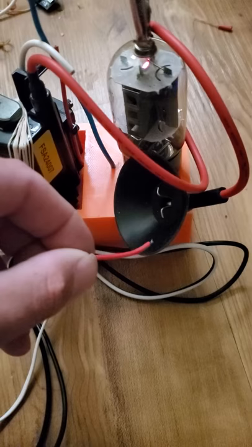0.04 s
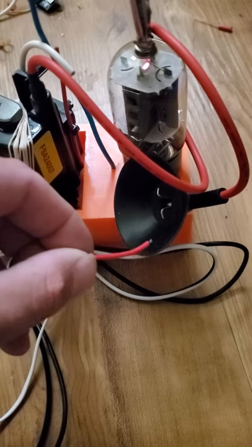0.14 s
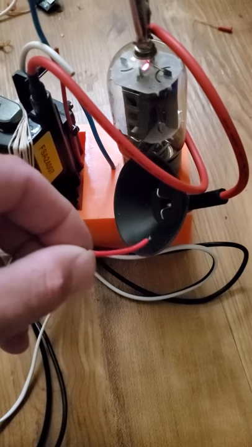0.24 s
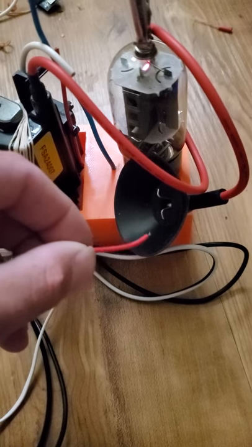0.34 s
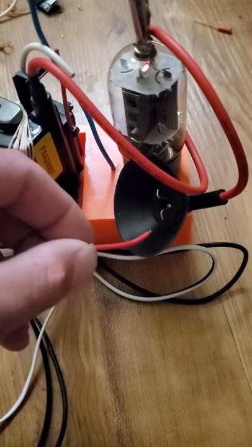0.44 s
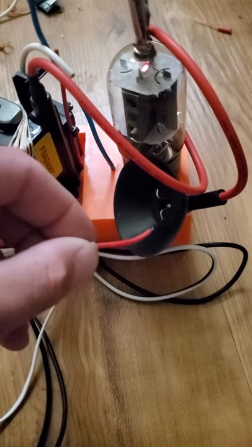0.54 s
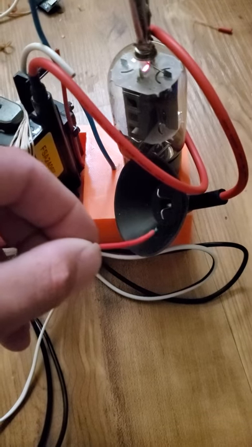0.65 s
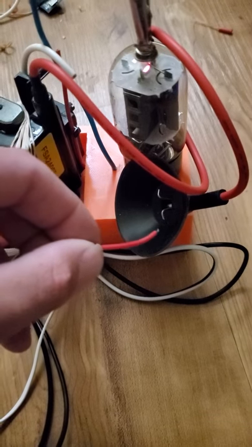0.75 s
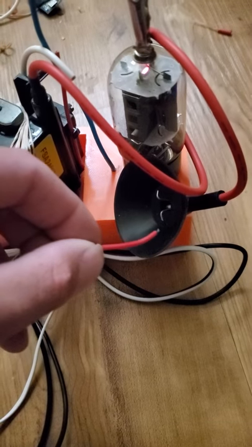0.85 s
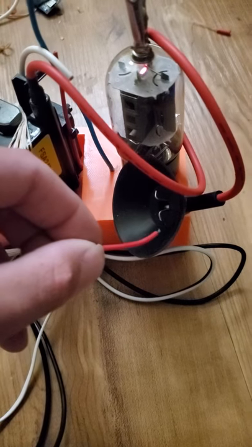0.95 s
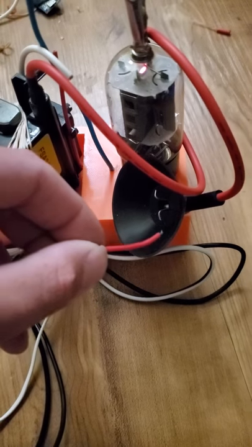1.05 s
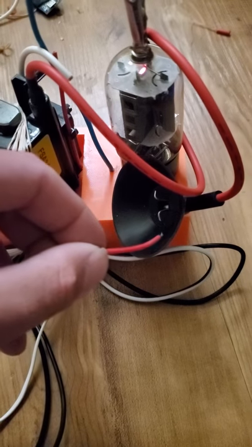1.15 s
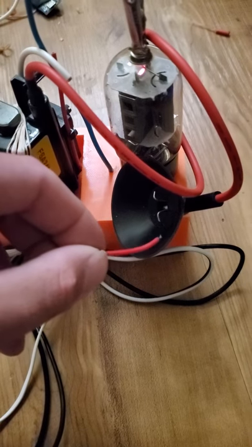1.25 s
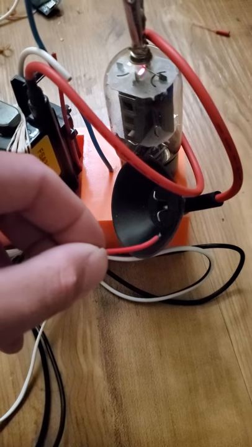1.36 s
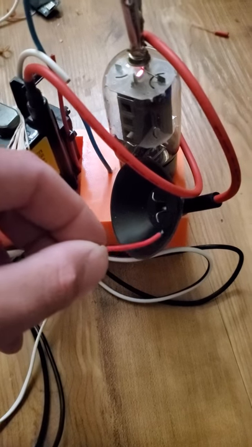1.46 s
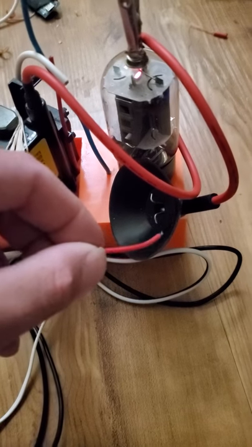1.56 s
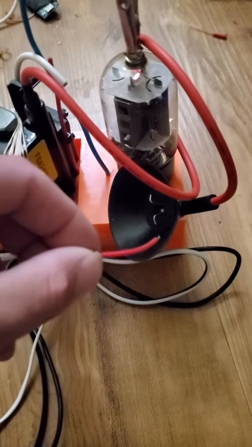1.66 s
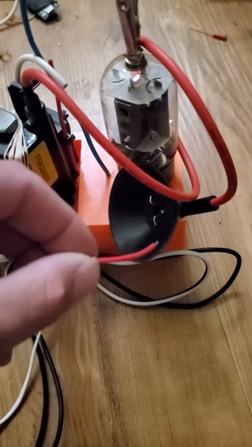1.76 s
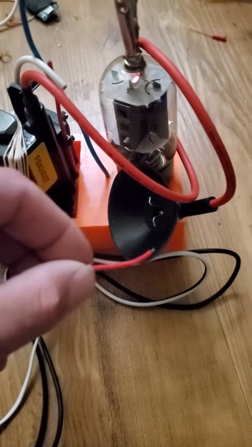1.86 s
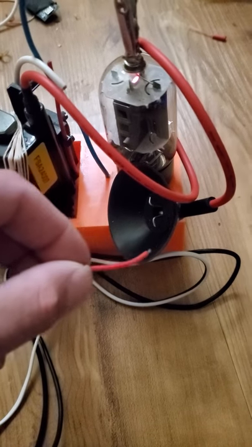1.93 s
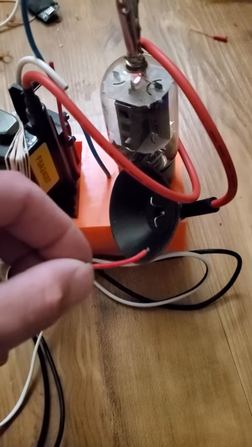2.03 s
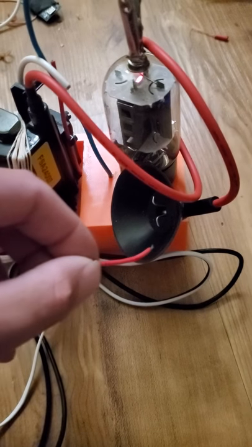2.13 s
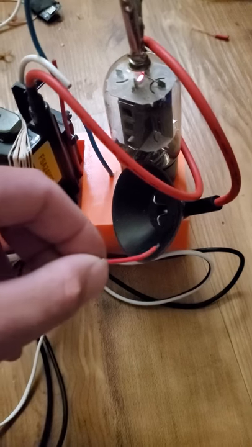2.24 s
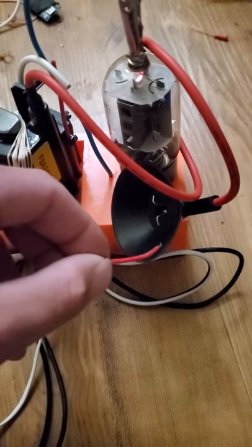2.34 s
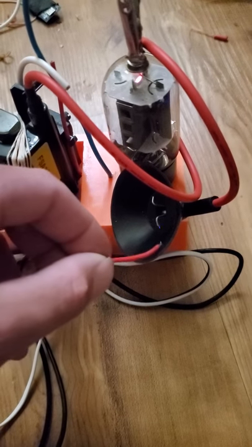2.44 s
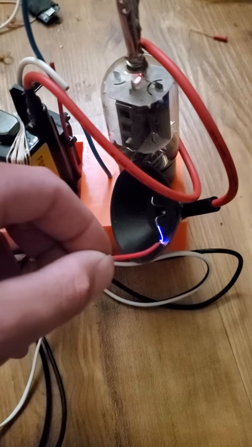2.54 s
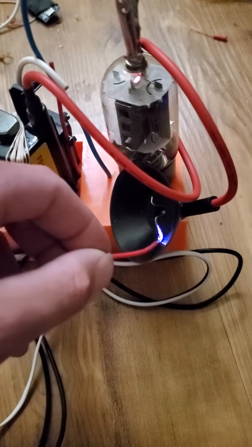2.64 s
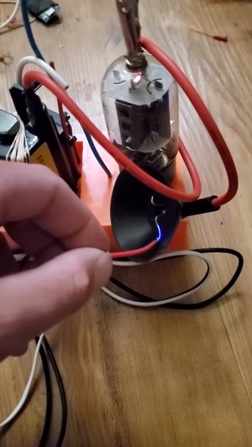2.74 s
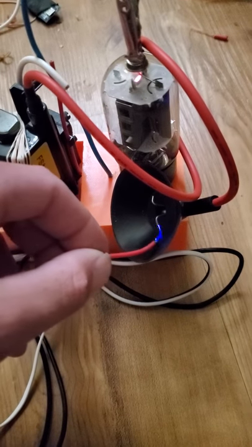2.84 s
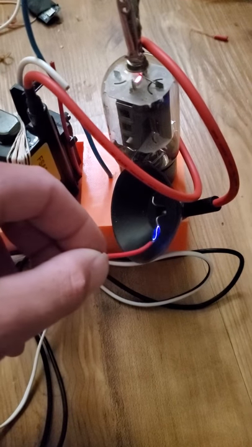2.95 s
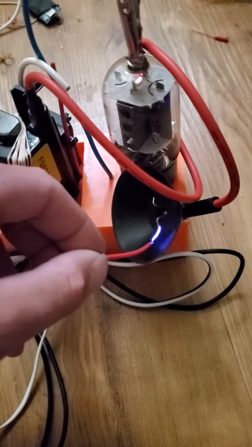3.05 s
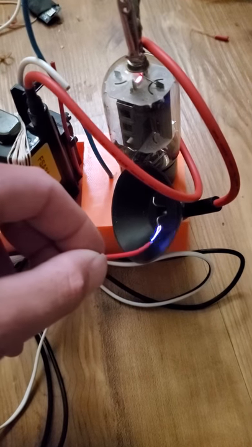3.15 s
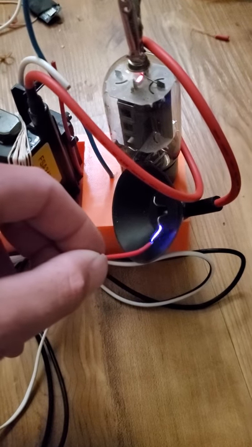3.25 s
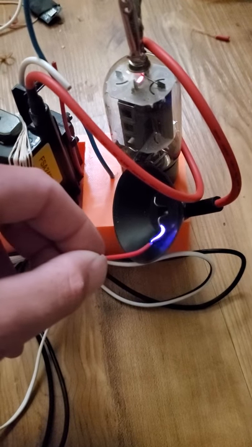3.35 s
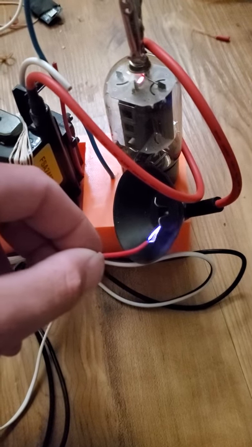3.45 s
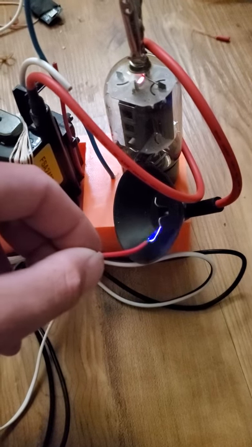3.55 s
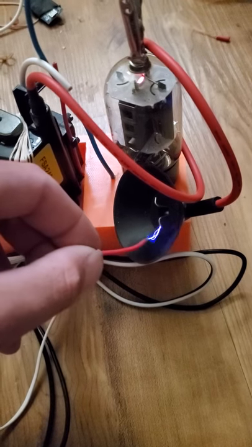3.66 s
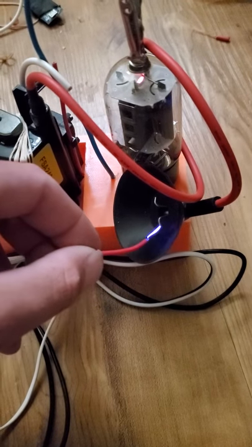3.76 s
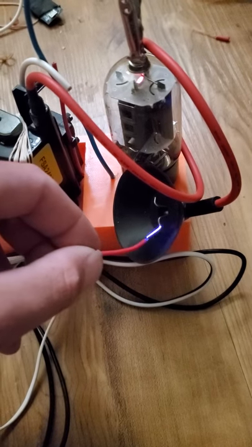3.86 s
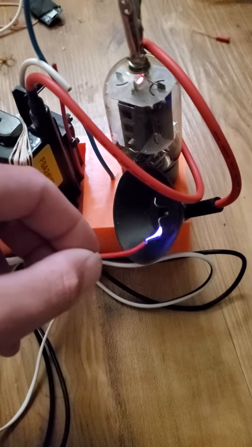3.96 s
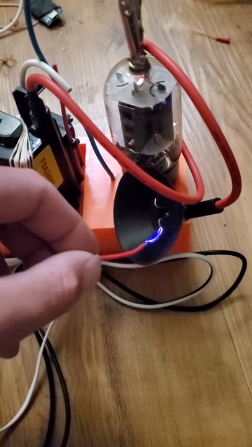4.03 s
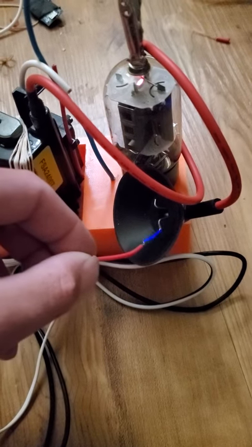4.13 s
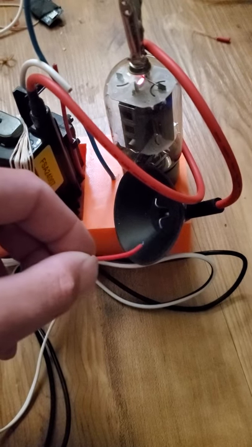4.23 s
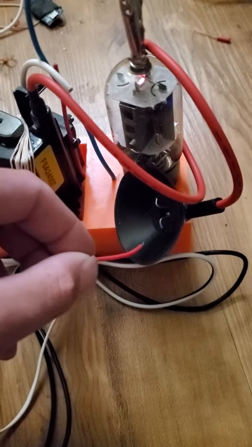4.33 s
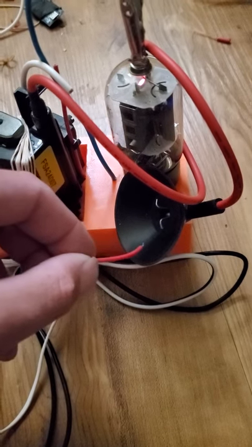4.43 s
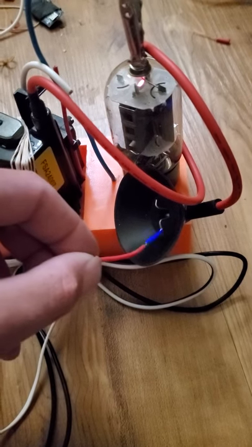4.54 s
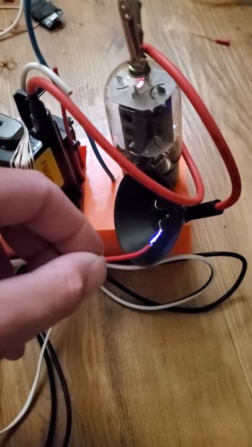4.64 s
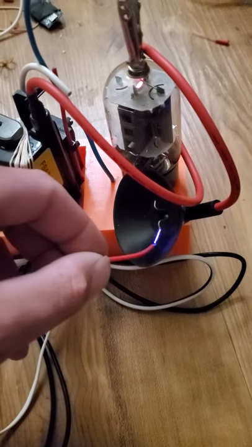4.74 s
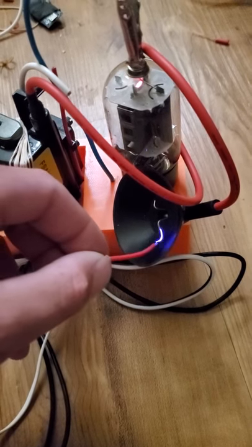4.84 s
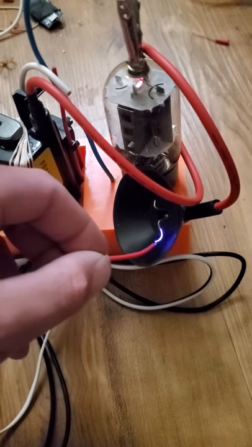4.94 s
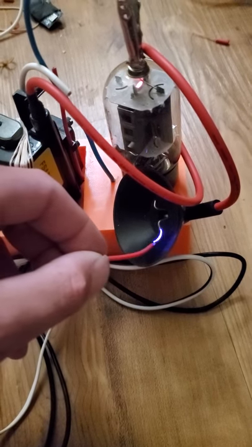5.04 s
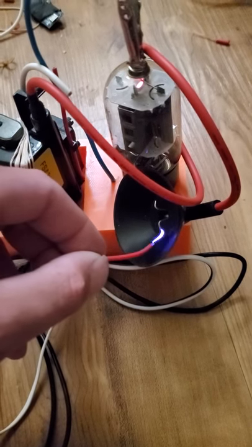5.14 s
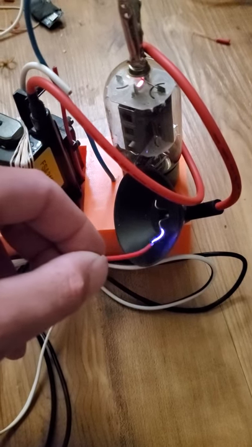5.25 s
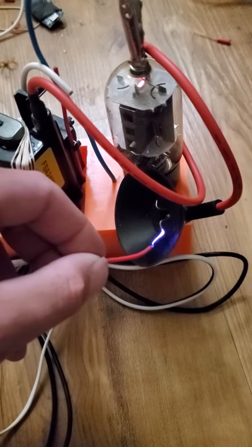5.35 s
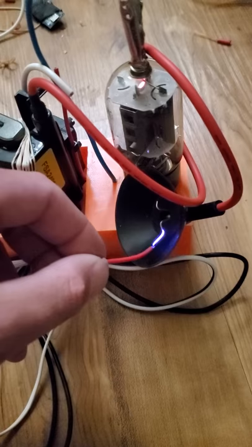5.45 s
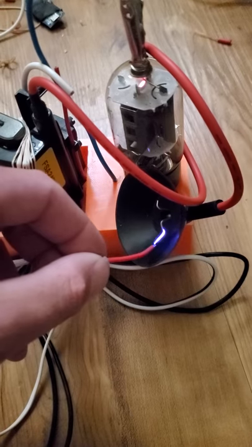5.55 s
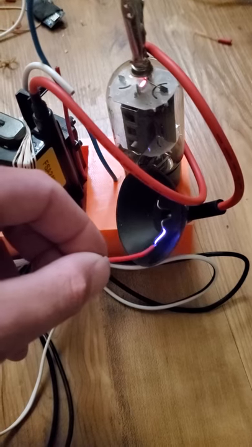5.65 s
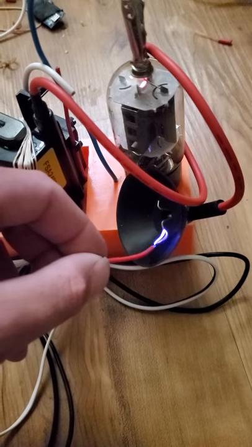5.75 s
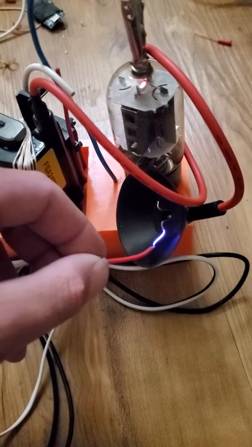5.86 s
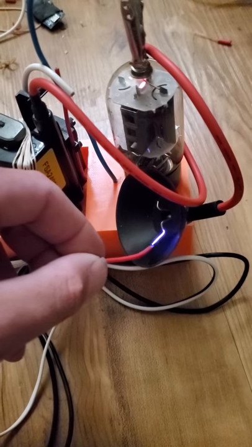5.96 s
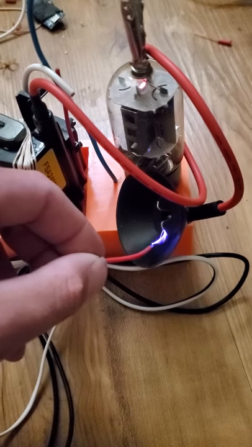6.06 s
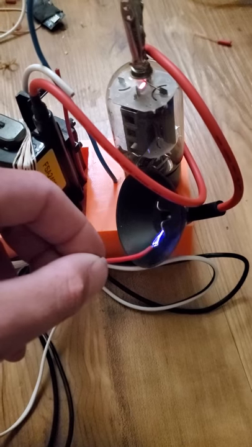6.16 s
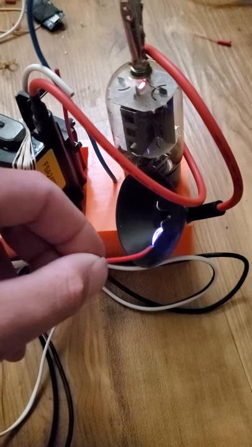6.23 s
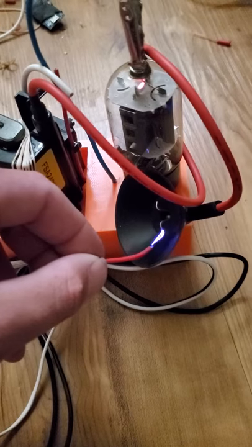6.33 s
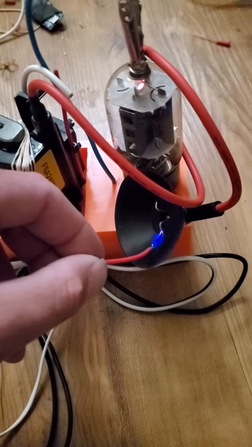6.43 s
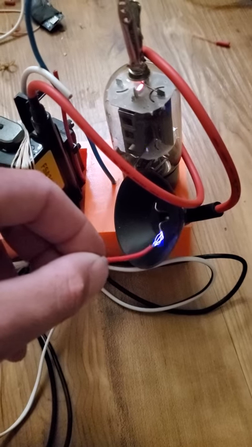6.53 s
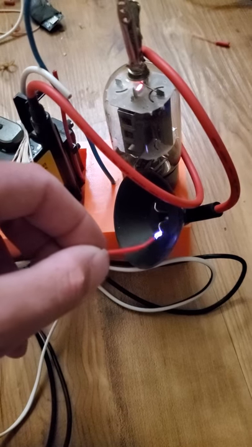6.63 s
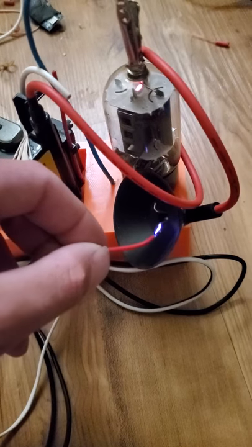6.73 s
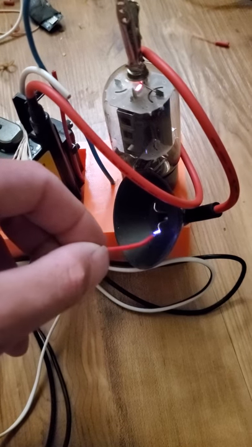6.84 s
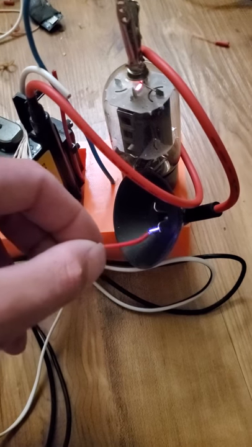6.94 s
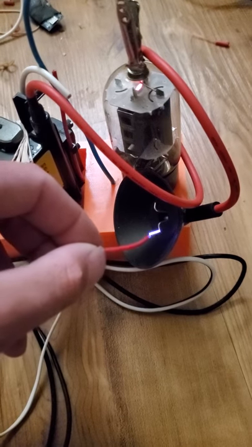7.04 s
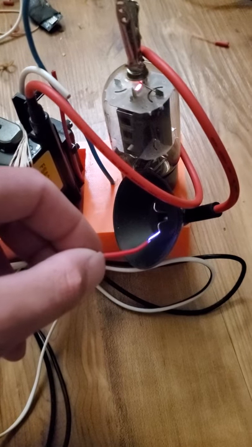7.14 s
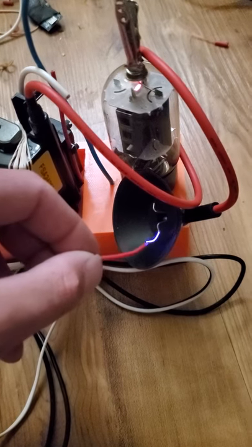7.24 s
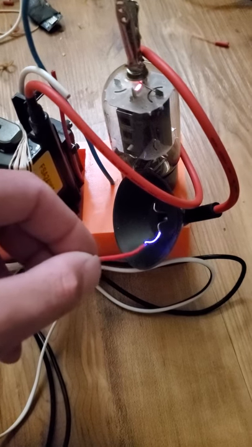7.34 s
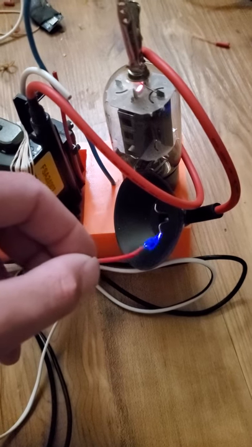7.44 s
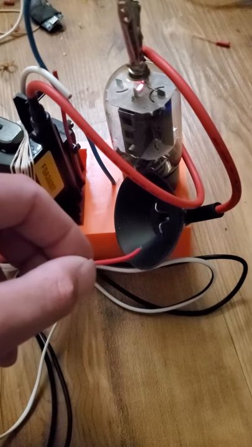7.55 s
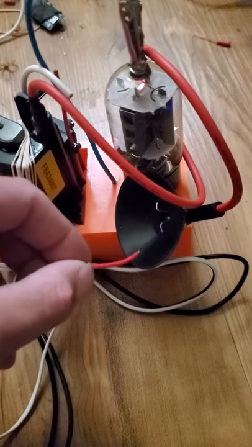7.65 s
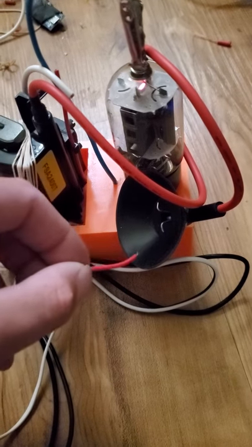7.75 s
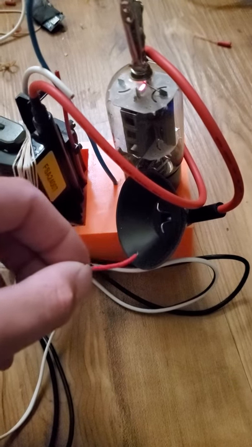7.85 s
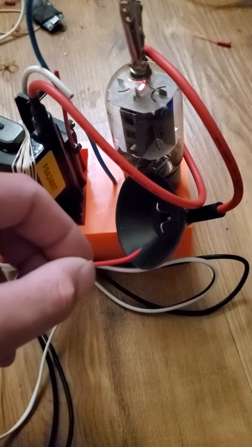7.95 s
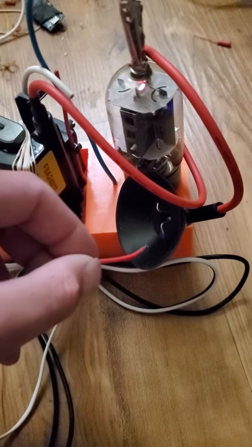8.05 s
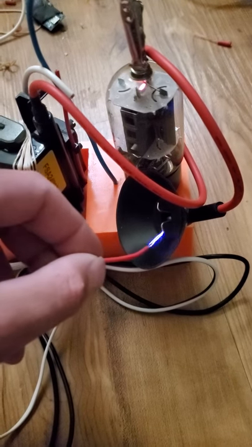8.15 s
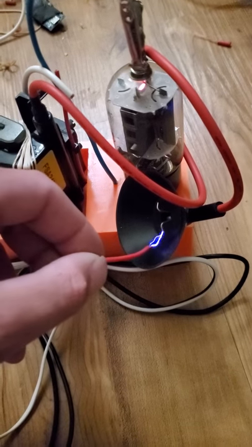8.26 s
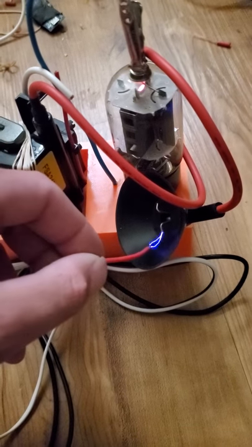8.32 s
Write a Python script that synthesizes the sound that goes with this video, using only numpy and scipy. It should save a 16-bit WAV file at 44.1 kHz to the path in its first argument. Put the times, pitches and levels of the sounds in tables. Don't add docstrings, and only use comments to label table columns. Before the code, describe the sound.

High-voltage sparks snap, spit and buzz harshly in fits over a piercing steady whine and a soft cooling-fan hum, with short quiet gaps between.

```python
import sys
import numpy as np
from scipy import signal
from scipy.fft import rfft, irfft, next_fast_len
from scipy.io import wavfile
from scipy.ndimage import uniform_filter1d

SR = 44100
rng = np.random.default_rng(int(sys.argv[2]) if len(sys.argv) > 2 else 0)


def decibels_to_gain(level_db):
    exponent = np.asarray(level_db, float) / 20
    return 10 ** exponent


def to_wav(sig):
    pcm = np.clip(np.atleast_2d(sig), -1, 1) * 32767
    pcm = np.round(pcm).astype(np.int16)
    wavfile.write(sys.argv[1], SR, pcm.T)


N = 369999


def even(x):
    return x / np.sqrt(np.mean(x ** 2) + 1e-20)


def read(points, hz):
    f, value = np.transpose(points)
    return np.interp(np.log(hz + 1), np.log(f + 1), value)


def curve(rows, column):
    rows = np.array(rows)
    return np.interp(np.arange(N) / SR, rows[:, 0], rows[:, column])


def wander(size):
    return even(uniform_filter1d(uniform_filter1d(rng.standard_normal(N), size), size))


def clicks(places, sizes):
    at = np.floor(places)[:, None] + np.arange(-8, 9)
    off = at - places[:, None]
    shape = np.sinc(off) * np.cos(np.pi * off / 18) ** 2
    return np.bincount(at.astype(int).ravel(), (sizes[:, None] * shape).ravel())


def ports(x, left=0, right=0, right_db=0.):
    return np.array([np.roll(x, round(left)), decibels_to_gain(right_db) * np.roll(x, round(right))])


def sparks(turns, drive_hz):
    cold, hot = np.zeros((2, N))
    lone = snaps()
    cold[:len(lone)] = lone
    unrest = np.minimum(np.exp(.6 * wander(size=150)), 1.3)
    flicker = decibels_to_gain(1.8 * wander(size=120))
    for run in runs():
        start, part = run_of_sparks(run, turns, drive_hz, unrest)
        cycles = run[3]
        train = hot if cycles < 4.5 else cold
        part = part[:N - start]
        train[start:start + len(part)] += part
    return cold, hot * flicker


def run_of_sparks(run, turns, drive_hz, unrest):
    s, length, db, cycles, scatter = run
    a, b, c = rng.standard_normal((3, 2600))
    ends = np.round(np.array([s, s + length]) * SR).astype(int)
    first, last = np.ceil(turns[np.minimum(ends, N - 1)])
    along = np.minimum(s * SR + np.arange(len(a)) * cycles * SR / 8200, N - 1).astype(int)
    stray = 1.3 * min(cycles, 3) * scatter ** 2 * unrest[along] * a
    wait = np.maximum(np.round(cycles * np.exp(np.clip(stray, -1, 1))), 1)
    fire = np.cumsum(wait) - wait[0]
    inside = fire <= last - first
    wait, fire = wait[inside], fire[inside]
    odd = np.arange(len(wait)) % 2 * (1 + (cycles == 2))
    fire = fire + 0.028 * odd + 0.18 * scatter * b[:len(wait)]
    spent = wait * np.exp(0.78 * scatter * c[:len(wait)])
    every = np.arange(last - first + 1)
    size = np.concatenate([spent, -np.ones(len(every))])
    size = size / np.sqrt(np.mean(wait ** 2) / np.mean(wait) - .9)
    place = np.interp(first + np.concatenate([fire, every]), turns, np.arange(N))
    size *= decibels_to_gain(-5 * (cycles > 4.5) * (place / SR - s - length / 2) / length)
    sag_hz = drive_hz[place.astype(int)]
    size *= decibels_to_gain(0.0652 * (cycles == 2) * (sag_hz.mean() - sag_hz))
    start = int(place.min()) - 20
    return start, clicks(place - start, decibels_to_gain(db + 4) * size)


def runs():
    # start t/s, length t/s, level/dB
    cold_spits = [(2.621, 0.0088, -10.5), (2.643, 0.028, -14), (2.93, 0.0061, -14), (2.976, 0.0039, -9),
                  (3.014, 0.0031, -15), (3.018, 0.046, -12.5), (3.155, 0.014, -10.5), (3.276, 0.013, -15.5),
                  (3.353, 0.024, -11.5), (3.443, 0.015, -10.5), (3.487, 0.022, -17.5), (3.58, 0.029, -10),
                  (3.686, 0.011, -10), (3.714, 0.018, -12.5), (4.664, 0.0099, -10), (4.687, 0.017, -8.5),
                  (5.096, 0.03, -24), (6.074, 0.0092, -12.5), (6.124, 0.0056, -6), (6.147, 0.012, -8),
                  (6.19, .004, -10), (6.197, .006, -9), (6.206, 0.0079, -12), (6.225, 0.031, -12.5),
                  (6.306, .015, -11), (6.559, 0.022, -14.5), (6.602, 0.02, -12), (7.3943, 0.01, -11),
                  (7.427, 0.0019, -12.5), (7.447, .002, -9), (8.175, 0.0079, -7.5), (8.227, 0.012, -10)]
    # start t/s, length t/s, level/dB, drive cycles per spark
    hot_sizzle = [(3.07, 0.047, -18.5, 2.42), (3.1903, 0.019, -16.5, 2.8), (3.221, 0.026, -17, 2.3),
                  (3.286, 0.015, -16, 2.37), (3.406, 0.006, -24, 2.2), (3.754, 0.028, -21, 2.57),
                  (3.83, 0.054, -24, 2.47), (3.897, 0.029, -21, 2.5), (3.929, 0.047, -20.5, 2.34),
                  (5.133, 0.15, -17.5, 2.4), (5.274, 0.032, -25, 1.4), (5.358, 0.016, -18.5, 2.8),
                  (5.379, 0.023, -15, 3.2), (5.462, 0.039, -15, 3.3), (5.515, 0.053, -21.5, 2.43),
                  (5.572, 0.084, -15, 3.2), (5.652, 0.025, -20.5, 2.2), (5.681, 0.02, -14.5, 3.9),
                  (5.759, .012, -16, 2.55), (5.775, 0.044, -19, 2.44), (5.835, 0.15, -17, 2.73),
                  (5.983, 0.053, -19, 3.2), (6.295, 0.0069, -24, 2.4), (6.337, 0.042, -18.5, 3.1),
                  (6.614, 0.075, -18, 3.08), (6.728, 0.21, -19.5, 3.06)]
    # start t/s, length t/s, level/dB, scatter/0-1
    half_rate = [(3.302, 0.026, -18.5, 0.22), (3.399, 0.02, -15.5, 0.08), (3.51, 0.0083, -14.5, 0.13),
                 (3.737, 0.013, -27, 0.34), (3.781, 0.044, -29.5, .16), (3.969, 0.045, -21, 0.08),
                 (4.735, .03, -35.5, 0.22), (4.766, 0.058, -45.5, 0.2), (5.058, 0.0049, -36, 0),
                 (5.3, 0.057, -20.5, 0), (5.415, 0.047, -22.5, 0.23), (5.494, 0.02, -21, 0.2),
                 (5.706, 0.049, -17, 0), (6.027, 0.045, -19, 0), (6.254, 0.046, -18.5, 0.08),
                 (6.323, 0.015, -19, 0.12), (5.392, .008, -26, 0.2), (5.769, .011, -22, .1),
                 (5.798, 0.017, -24, 0.06), (5.852, 0.011, -21, 0.2)]
    # start t/s, length t/s, level/dB, scatter/0-1
    third_rate = [
        (6.928, .12, -20.5, .185),
        (7.046, .154, -18, .21),
    ]
    spits = [(*row, 7.5, 0.32) for row in cold_spits]
    sizzle = [(*row, .22 + 0.16 * np.exp(-row[1] / 0.023)) for row in hot_sizzle]
    halves = [(s, length, db, 2, scatter) for s, length, db, scatter in half_rate]
    thirds = [(s, length, db, 3, scatter) for s, length, db, scatter in third_rate]
    return spits + sizzle + halves + thirds


def snaps():
    # t/s, peak level/dB, restrike level/dB
    lone_sparks = [(2.5586, 3, -19), (2.5891, 2, -17), (2.634, -4, -17), (2.684, -9, -4), (2.7505, -3, -20),
                   (2.9186, -1.5, -20), (2.942, -1.5, -24), (2.998, -4, -24), (3.339, -5, 0),
                   (3.438, -3, -20), (3.5285, -3, -23), (3.551, 0.5, -20), (3.555, -1, -1),
                   (3.575, -1, -22), (3.6246, -7, -10), (3.645, 2, -24), (3.6599, -2, -7), (3.1881, 0, 4),
                   (6.729, -14, 1.5), (4.6344, -2, -0.5), (4.653, 0, -21), (5.3, -11, -15),
                   (6.517, -0.5, -7), (6.1898, -1, -2), (7.4253, -3, -20), (6.586, 1, -1.5),
                   (8.145, 2.1, -22), (8.2715, -9, -26), (8.277, -2, -20), (8.279, -5, -22),
                   (8.3025, -4.5, -7), (8.344, -5, -28.5)]
    # first t/s, last t/s, pace t/s, peak level/dB
    chatter = [
        (3.695, 3.712, 0.0068, -7),
        (6.1, 6.123, 0.0066, 1),
        (6.1388, 6.138, 0.0098, 3),
        (6.5229, 6.55, 0.0064, -0.3),
        (8.2029, 8.213, 0.0079, -3),
        (8.258, 8.268, 0.0085, -0.5),
        (8.2927, 8.322, 0.011, -2.5),
        (3.009, 3.02, 0.0053, -8.5),
        (7.3644, 7.38, 0.0086, -11),
    ]
    s, db, again_db = np.transpose(lone_sparks)
    s = np.append(s, s + 0.0052 + 0.0011 * rng.standard_normal(len(s)))
    db = np.append(db, again_db)
    for first, last, pace, peak_db in chatter:
        slip, vary = rng.standard_normal((2, 12))
        at = np.arange(first, last, max(pace, .003))[:12]
        s = np.append(s, at + 0.00044 * slip[:len(at)])
        db = np.append(db, peak_db + 1.5 * vary[:len(at)])
    return clicks(s * SR, decibels_to_gain(db + 8))


def corona():
    # t/s, level/dB
    streamers = [(2.4, -104), (2.52, -50), (2.6, -33), (2.8, -58), (3.7, -37.5), (4.0, -39.5), (4.1, -64.5),
                 (4.5, -92), (4.62, -36), (4.8, -54), (5.1, -46), (5.2, -34), (7.2, -50), (7.36, -42),
                 (7.5, -96), (8.0, -81), (8.13, -41.5), (8.3, -48)]
    fired = rng.random(N) < 5000 / SR
    sizes = decibels_to_gain(5.8 * np.minimum(rng.exponential(1, N), 4))
    return decibels_to_gain(curve(streamers, 1)) * even(fired * sizes)


def pulse(db, late=0., trail=0.):
    log_gain = np.log(decibels_to_gain(np.concatenate([db, db[-2:0:-1]])))
    turn = np.exp(-1j * 0.26 * signal.hilbert(log_gain).imag)
    cycles = np.fft.fftfreq(len(turn))
    sweep = np.sign(cycles) * np.clip(abs(cycles) - .22, 0, 1) ** 2 * 60
    turn *= np.exp(-2j * np.pi * (late * cycles - sweep))
    trail = trail * np.ones(len(db))
    turn *= np.exp(1j * np.concatenate([trail, -trail[-2:0:-1]]))
    turn *= 1 + decibels_to_gain(-9) * np.exp(-2j * np.pi * cycles * 21.16)
    return np.fft.fftshift(np.fft.ifft(np.exp(log_gain) * turn).real)


def arc_at_ports(cold, hot):
    # f/Hz, level/dB
    near_spectrum = [(350, -43), (650, -29.5), (1250, -31.5), (1600, -17.5), (2100, -20), (2700, -11),
                     (3400, -7), (4000, -20), (5300, -19.5), (6500, -25), (7500, -10), (9200, -10.5),
                     (10000, -5.5), (12000, -5), (14200, 3.5), (15650, -8), (15950, -38.5)]
    # f/Hz, added level/dB
    hot_colour = [(1000, 4.5), (2000, 6), (3500, 4), (4100, 12), (4700, 10), (6000, 11.5), (8000, 5.5),
                  (10000, 1.5), (14500, 1), (15500, -2)]
    # f/Hz, level/dB
    far_shadow = [(1000, 3.5), (1800, 6), (2400, -8.5), (3200, 0.5), (4100, -1), (5200, -5), (6200, -0.5),
                  (8000, -3.5), (10300, -2.5), (11500, 1), (12800, -5), (14000, -12), (14700, -9),
                  (15500, -1)]
    # f/Hz, phase/rad
    far_trail = [(500, .3), (1000, .6), (1500, -.6), (1900, -2), (2300, -6), (2800, -10), (3500, -12.2),
                 (3800, -12.4), (4050, -15.4), (4250, -15.7), (4600, -18), (5100, -19.4), (7500, -17.5),
                 (8300, -18.2), (14300, -18.8)]
    hz = np.fft.rfftfreq(2048, 1 / SR)
    scale = np.linalg.norm(pulse(read(near_spectrum, hz)))
    arc = np.zeros((2, N))
    for train, heat in ((cold, 0), (hot, 1)):
        db = read(near_spectrum, hz) + heat * read(hot_colour, hz)
        near = pulse(db)
        far = pulse(db + read(far_shadow, hz), late=7.86, trail=read(far_trail, hz))
        arc += signal.fftconvolve(ports(train), np.array([near, far]) / scale, "same", axes=1)
    arc[1] = scattered(arc[1])
    return arc


def scattered(response):
    share, decay_s, from_hz = 0.5, 0.0013, 5500
    fade = np.exp(-np.arange(300) / (decay_s * SR))
    spray = rng.standard_normal(300) * (rng.random(300) < .4) * fade
    spray *= share / np.linalg.norm(spray)
    spray[0] = np.sqrt(1 - share ** 2)
    size = next_fast_len(len(response) + 4096)
    short = np.clip(np.fft.rfftfreq(size, 1 / SR) / from_hz - .9, 0, .1) * 10
    turn = np.exp(1j * short * np.angle(rfft(spray, size)))
    return irfft(rfft(response, size) * turn, size)[:len(response)]


def drive():
    # t/s, level/dB
    idle = [(0.01, -46.5), (0.13, -53), (0.17, -45.5), (0.24, -53.5), (0.32, -45.5), (0.6, -43),
            (1.14, -40.5), (2.39, -44.5), (2.54, -36.5), (2.69, -47.5), (2.91, -40), (4.03, -43.5),
            (4.23, -50), (4.69, -42), (7.45, -41), (7.52, -47), (8.15, -44), (8.37, -45)]
    # start t/s, length t/s, first f/Hz, last f/Hz, level/dB
    loaded = [(3.063, 0.064, 8440, 8203, -33), (3.189, 0.16, 8250, 8160, -28),
              (3.391, .04, 8140, 8150, -24.5), (3.492, .04, 8150, 8178, -26),
              (3.734, 0.044, 8180, 8380, -43), (3.768, .16, 8310, 8350, -33),
              (3.925, 0.086, 8330, 8140, -32.5), (4.694, 0.097, 8260, 8340, -34.5),
              (4.796, 0.11, 8250, 8190, -31), (4.884, 0.11, 8200, 8143, -31.5),
              (4.975, 0.15, 8175, 8100, -29), (5.12, .18, 8283, 8390, -33.5),
              (5.3, .062, 8256, 8260, -28.5), (5.365, .05, 8370, 8380, -26),
              (5.413, 0.27, 8354, 8324, -27.5), (5.71, 0.059, 8125, 8055, -32),
              (5.769, 0.24, 8257, 8310, -28), (6.016, 0.056, 8210, 8114, -26),
              (6.211, .035, 8200, 8444, -35), (6.246, .062, 8223, 8115, -28),
              (6.314, 0.081, 8240, 8330, -27.5), (6.623, 0.071, 8800, 8626, -36),
              (6.683, 0.051, 8190, 8210, -31), (6.734, 0.2, 8580, 8810, -43),
              (6.956, 0.085, 8890, 8893, -35), (7.045, 0.15, 8820, 8550, -40.5),
              (7.228, .15, 8280, 8163, -28)]
    idle_hz = 8033 + 76 * np.exp(-np.arange(N) / SR / .75)
    hz, db = idle_hz.copy(), curve(idle, 1)
    wobble, flutter_db = .09 * wander(size=250), 1.5 * wander(size=200)
    next_starts = [row[0] for row in loaded][1:] + [N]
    for (s, length, first_hz, last_hz, level_db), next_s in zip(loaded, next_starts):
        if next_s - s - length < .025:
            length = next_s - s
        span = slice(round(s * SR), round((s + length) * SR))
        glide = np.linspace(first_hz, last_hz, span.stop - span.start)
        hz[span] = glide
        db[span] = level_db - 0.1133 * (glide - glide.mean()) + flutter_db[span]
    size = round(.009 * SR)
    hz = uniform_filter1d(hz, size)
    return hz + wobble * (hz - idle_hz), uniform_filter1d(db, size)


def whine(turns, db):
    tone = np.sqrt(2) * decibels_to_gain(db + 0.098 * wander(size=300)) * np.sin(2 * np.pi * turns)
    return ports(tone, right_db=-10.5)


def room(x):
    # f/Hz, t60/s
    decay = [(500, 0.35), (2000, 0.16), (6000, 0.23), (14000, 0.14)]
    slots = np.arange(100, SR // 2, 10)
    shape = (2, len(slots))
    taps = np.zeros((2, SR // 2 + 10))
    np.put_along_axis(taps, slots + rng.integers(0, 10, shape), rng.choice([-1., 1.], shape), 1)
    hz, t, z = signal.stft(taps, SR, nperseg=128)
    fade = decibels_to_gain(-60 * t / read(decay, hz)[:, None])
    tail = signal.istft(z * fade, SR, nperseg=128)[1]
    tail *= decibels_to_gain(-5.0) / np.linalg.norm(tail[0])
    tail[:, 175] += decibels_to_gain(-12.5)
    return signal.fftconvolve(x, tail, axes=1)[:, :N]


def air_rush():
    # f/Hz, level/dB per Hz
    rush_spectrum = [(25, -25), (50, -23.5), (100, 4.5), (130, -32.5), (190, -12), (360, -19.5),
                     (600, -20.5), (1080, -13), (1400, -10.5), (2000, -18), (3400, -31), (5700, -28.5),
                     (7700, -29.5), (8400, -77), (10500, -77), (11000, -41.5), (12700, -45), (13000, -78)]
    # f/Hz, likeness/0-1
    likeness = [(60, 1), (170, 0.995), (260, 0.4), (500, .8), (1000, 0.64), (6000, 0.43)]
    frames, hz = N // 256 + 5, np.fft.rfftfreq(1024, 1 / SR)
    a, b, c, d, patches = rng.standard_normal((frames, 513, 5)).T
    patches = even(uniform_filter1d(uniform_filter1d(patches, 10, 0), 12, 1))
    like = np.clip(read(likeness, hz), 0, 1)[:, None]
    left = a + 1j * b
    right = like * left + np.sqrt(1 - like ** 2) * (c + 1j * d)
    gain = decibels_to_gain(read(rush_spectrum, hz)[:, None] + 0.91 * patches)
    rush = signal.istft(np.array([left, right]) * gain, nperseg=1024, noverlap=768)[1][:, :N]
    rush = decibels_to_gain(-53.5) * even(rush)
    rush[0] = np.roll(rush[0], 15)
    return rush


def supply_lines():
    # f/Hz, and level/dB
    line_hz = [88, 104, 120, 873, 1089, 1397, 1746, 2095, 2182, 2444, 2618, 2793, 3055, 4366, 5238, 5674]
    line_db = [-62, -66, -62, -70.5, -71.5, -75.5, -63, -71, -65, -64.5, -67, -70, -77.5, -78, -80, -75]
    t = np.arange(N) / SR
    lines = np.zeros(N)
    for hz, db in zip(line_hz, line_db):
        level = decibels_to_gain(db + 2.5 + 1.0 * wander(size=2500))
        lines += level * np.sin(2 * np.pi * (hz * t + rng.random()))
    beat = np.sin(np.pi * 4.68 * (t - .36))
    lines += decibels_to_gain(-63) * beat * np.sin(2 * np.pi * 358.3 * t)
    swell = np.clip(1 + .9 * wander(size=2500), 0, 1.5)
    lines += decibels_to_gain(-62) * swell * np.sin(2 * np.pi * (15644 * t + .15 * wander(size=900)))
    return ports(lines, left=13.46)


def fan():
    # t/s, level/dB
    mic_gain = [
        (0, 3),
        (2.53, 2.5),
        (2.62, -6.5),
        (3.6, -5.5),
        (4.5, -4),
        (5.5, -4.5),
        (8.39, -4),
    ]
    return (air_rush() + supply_lines()) * decibels_to_gain(curve(mic_gain, 1))


def scene():
    drive_hz, drive_db = drive()
    turns = np.cumsum(drive_hz + 6 * wander(size=200)) / SR
    cold, hot = sparks(turns, drive_hz)
    arc = arc_at_ports(cold, hot + corona())
    tone = whine(turns, drive_db)
    return arc + tone + room(arc + decibels_to_gain(-7) * tone) + fan()


def band_limit(x):
    return signal.sosfilt(signal.butter(12, 16810, fs=SR, output="sos"), x)


def record(dry):
    limited = np.tanh(dry * 1.1) / 1.1
    edged = signal.oaconvolve(limited, signal.firwin(255, 16500, fs=SR)[None], "same")
    return band_limit(edged)


dry = scene()
out = record(dry)
to_wav(out)
```